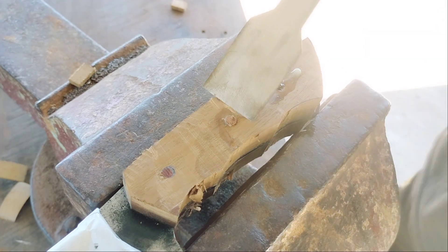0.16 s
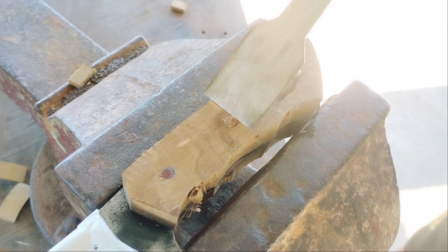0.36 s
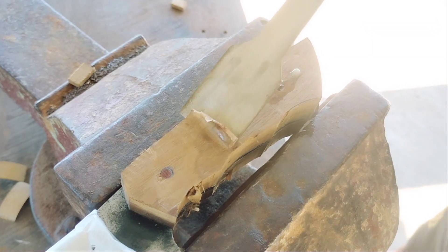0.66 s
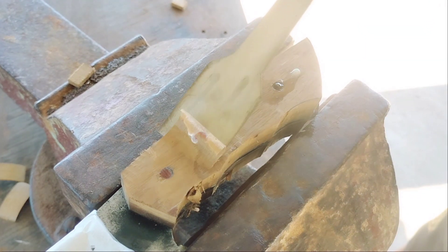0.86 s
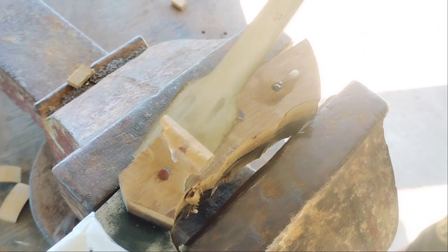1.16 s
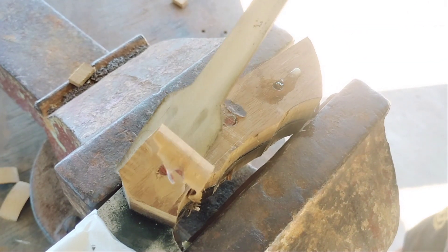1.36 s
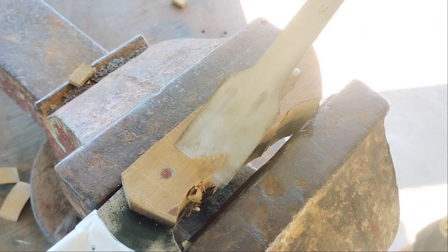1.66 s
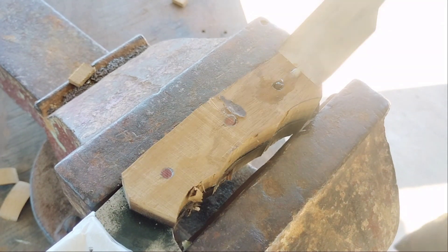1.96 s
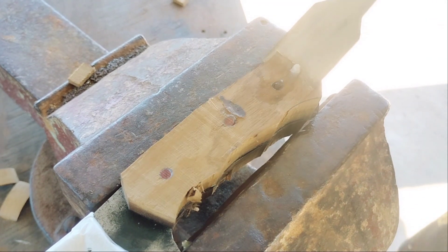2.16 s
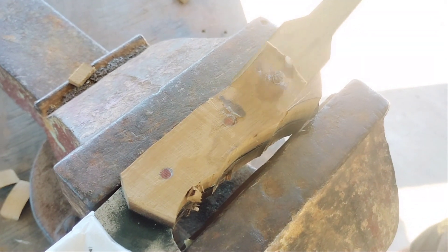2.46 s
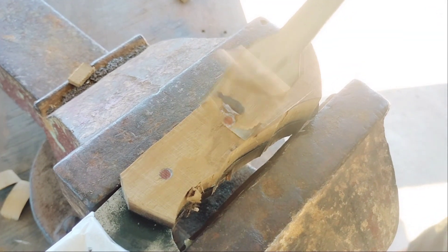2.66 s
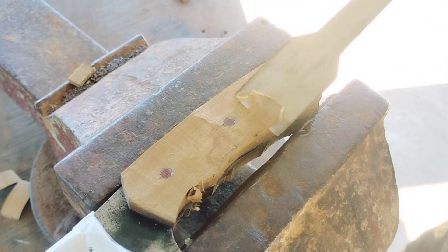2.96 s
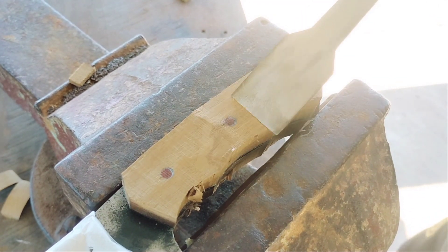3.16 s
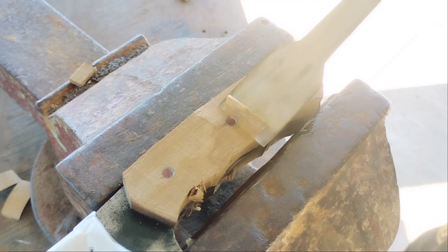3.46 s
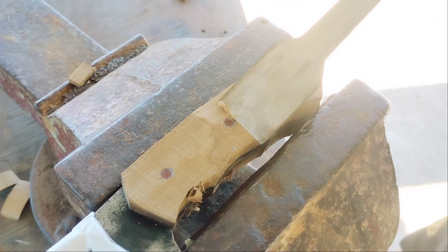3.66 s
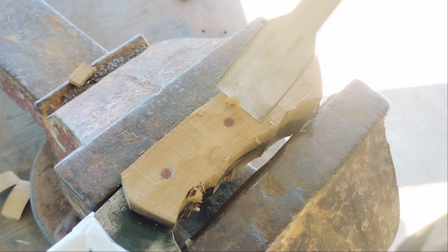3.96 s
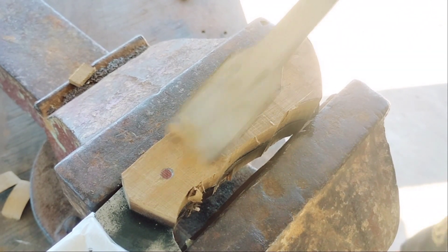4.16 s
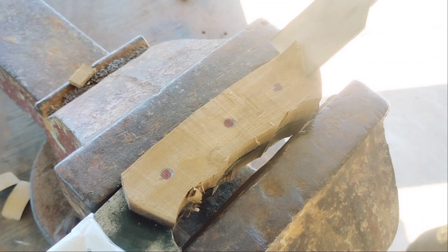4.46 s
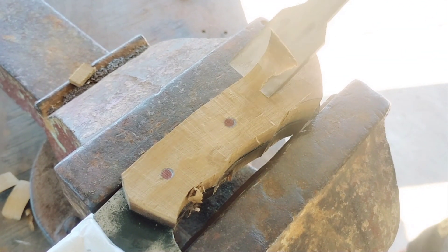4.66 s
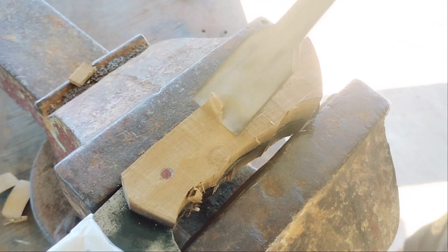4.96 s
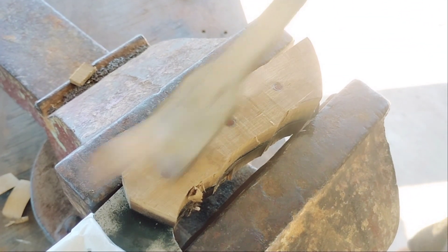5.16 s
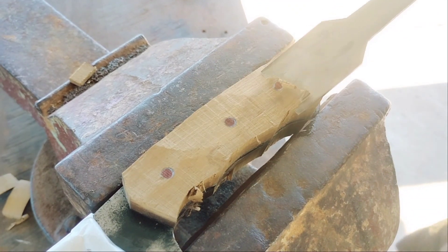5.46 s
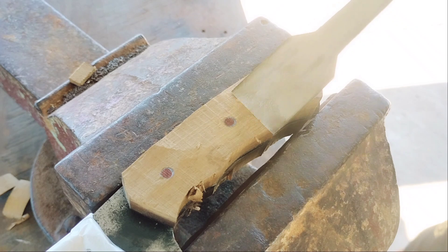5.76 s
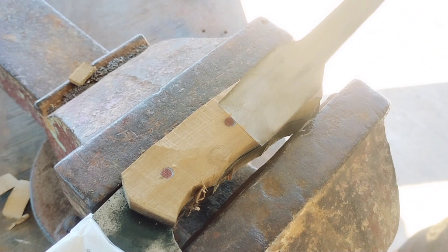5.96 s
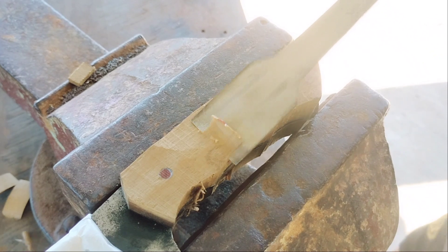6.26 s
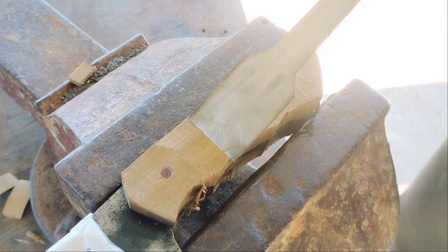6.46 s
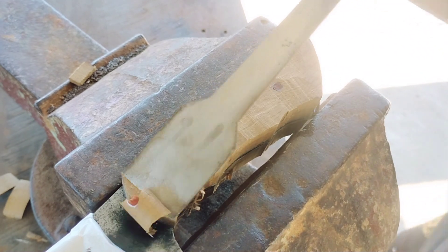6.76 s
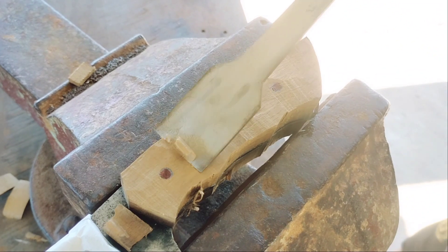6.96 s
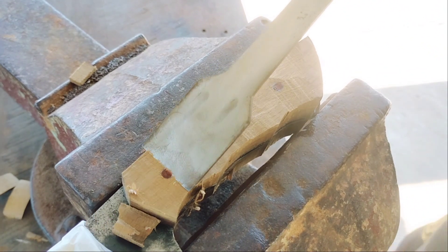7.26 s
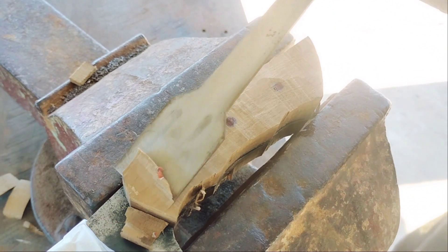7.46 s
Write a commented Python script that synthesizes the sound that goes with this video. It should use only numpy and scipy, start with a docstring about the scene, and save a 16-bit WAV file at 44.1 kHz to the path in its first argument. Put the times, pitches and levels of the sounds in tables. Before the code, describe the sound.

Wind hits the microphone at once, a cluster of low, rumbling thumps through the first 0.4 s, over a thin, far hissing rustle. A quiet, grainy scrape of steel on wood lies beneath, full of tiny fibre snaps. From about 0.4 s soft scraps of ringing appear, and near 0.6 s the first sharp knock. Strong, dry clacks follow around 1.0 to 1.4 s, bright steel with woody body, crunch and sizzle, each only milliseconds long and chopped off. A heavy gust thuds at 1.6 s. Knocks continue unevenly, several per second, with scraping rising near 2.2 s. Crisp hits stand out around 3.5, 4.5 and 5.4 s, while wind buffets densely from 4 to 5.5 s. Scraping swells again about 5.5 and 6.3 s; gusts thump near 6.1 and 6.8 s. Clipped blows persist to the end around 7.6 s.

```python
"""From the start wind buffets the microphone in thumps of filtered noise and jolts, over a far hissing rustle.
A steel blade scrapes along wood throughout: coloured noise full of tiny snaps.
From 0.4 s come soft-starting scraps of ringing, from 0.6 s also sharp blows of the chisel on its wooden handle
in a vise: decaying steel and wood partials, crunch and sizzle, each snippet cut off while it still rings."""
import sys
import numpy as np
from scipy import signal
from scipy.fft import rfft, irfft, next_fast_len
from scipy.io import wavfile
from scipy.ndimage import uniform_filter1d

SR = 44100
rng = np.random.default_rng(int(sys.argv[2]) if len(sys.argv) > 2 else 0)


def volts(x):
    """Linear amplitude factor 10**(x/20) for a level x in dB, scalar or array-like."""
    e = np.asarray(x, float) / 20
    return 10 ** e


def store_wav(level_fs):
    """Save 16-bit WAV to argv[1]."""
    pcm = np.round(np.clip(np.atleast_2d(level_fs), -1, 1) * 32767)
    wavfile.write(sys.argv[1], SR, pcm.T.astype(np.int16))


N = 335691


def rms_one(x):
    """Scale to unit power."""
    return x / np.sqrt(np.mean(x ** 2) + 1e-20)


def in_time(rows):
    """A breakpoint curve read at every sample."""
    return np.interp(np.arange(N) / SR, *np.transpose(rows))


def drift(corner_hz):
    """Random wander of rms 1: white noise through two equal one-pole low-passes."""
    r = np.exp(-2 * np.pi * corner_hz / SR)
    wander = signal.lfilter([1], [1, -2 * r, r * r], rng.standard_normal(N + SR))
    return rms_one(wander[SR:])   # the first second lets the filter settle


def band(x, low_hz, high_hz):
    """A band-pass."""
    return signal.sosfilt(signal.butter(2, [low_hz, high_hz], "band", fs=SR, output="sos"), x)


def coloured(spectrum, source):
    """A source shaped by a spectrum, rms 1."""
    hz, level_db = np.transpose(spectrum)
    size = next_fast_len(N)
    bins_hz = np.arange(size // 2 + 1) * SR / size + 1
    gain = volts(np.interp(np.log(bins_hz), np.log(hz), level_db))
    return rms_one(irfft(rfft(source, size) * gain, size)[:N])


def random_kicks(chance, spread_db):
    """Scattered clicks of either sign, each louder than 0 dB by a random amount."""
    excess_db = spread_db * np.minimum(rng.exponential(1, N), 4)
    return (rng.random(N) < chance) * rng.choice([-1, 1], N) * volts(excess_db)


# breeze between thumps: t/s, level/dB
BREEZE_CURVE = [(0.0, -23), (0.87, -37.5), (1.08, -25.5), (1.95, -36.5), (2.3, -31.5), (2.78, -40),
                (2.93, -30), (3.14, -28.5), (3.92, -31), (4.3, -24), (4.66, -29.5), (5.24, -26.5),
                (6.51, -33.5), (6.68, -34), (7.61, -33.5)]
# thumps of wind on the microphone: t/s, level/dB
THUMPS = [(0.03, -19), (0.059, -11.5), (0.093, -15.5), (0.149, -18.0), (0.169, -6.5), (0.206, -7.5),
          (0.252, -7), (0.277, -15), (0.315, -7), (0.353, -17.0), (0.374, -19.5), (0.458, -22.5),
          (0.59, -23.5), (0.771, -21.0), (0.808, -23), (0.956, -23.5), (1.044, -10.5), (1.063, -11.5),
          (1.087, -16.5), (1.122, -15.0), (1.149, -20.5), (1.163, -17.5), (1.216, -15), (1.451, -17.5),
          (1.473, -29), (1.621, -1.5), (1.648, -16.0), (1.668, -15.5), (1.701, -9.5), (1.836, -12.5),
          (1.876, -16), (1.891, -14.5), (1.952, -23), (2.259, -22), (2.39, -22), (2.682, -24.5),
          (2.913, -16.5), (2.93, -20.5), (2.959, -11.0), (2.981, -15), (3.187, -17.5), (3.215, -11.5),
          (3.352, -18.5), (3.364, -19.5), (3.403, -16.5), (3.432, -11), (3.47, -21.0), (3.49, -12),
          (3.511, -9.5), (3.544, -24), (3.875, -10.5), (4.049, -10.5), (4.079, -8.5), (4.122, -17.5),
          (4.14, -15.5), (4.166, -22.5), (4.283, -8.5), (4.328, -6), (4.355, -13), (4.376, -12.5),
          (4.407, -16.5), (4.462, -9.5), (4.496, -14.5), (4.566, -13), (4.579, -20.5), (4.793, -15.5),
          (4.815, -19.5), (4.895, -19.5), (4.965, -12.5), (5.02, -12), (5.036, -17.5), (5.07, -13),
          (5.119, -15.5), (5.157, -16.5), (5.209, -15.5), (5.304, -10), (5.326, -12.5), (5.358, -9),
          (5.413, -14), (5.46, -10.5), (5.534, -12), (5.583, -19.5), (5.654, -20), (5.743, -25.5),
          (5.765, -20), (5.832, -22.5), (5.873, -18.5), (5.907, -20.5), (6.046, -13.5), (6.098, -6.5),
          (6.122, -6.5), (6.276, -19.5), (6.374, -22.5), (6.488, -22), (6.508, -10), (6.597, -16),
          (6.648, -11), (6.7, -18.5), (6.745, -11.5), (6.779, -10.5), (6.811, -6), (6.833, -16),
          (6.852, -15.5), (6.88, -16.5), (6.892, -18), (6.928, -19), (6.97, -21), (7.231, -18),
          (7.345, -16.5), (7.386, -11), (7.486, -19.5), (7.593, -10.5)]
GUST_HOLD_S = 0.00801


def gusts():
    """Each thump leaps up, holds and sinks back into the breeze: level in dB."""
    rise_db_per_s, fall_db_per_s = 1000, 800
    t = np.arange(N) / SR
    level_db = in_time(BREEZE_CURVE) + 3.84 * drift(25)
    for s, db in THUMPS:
        near = slice(max(0, int((s - 0.1) * SR)), int((s + 0.2) * SR))
        early_s = np.maximum(s - t[near], 0)
        late_s = np.maximum(t[near] - s - GUST_HOLD_S, 0)
        own_db = db - rise_db_per_s * early_s - fall_db_per_s * late_s
        level_db[near] = np.maximum(level_db[near], own_db)
    return level_db


# wind bands: low f/Hz, high f/Hz, level/dB at a gust of -21 dB, slope/(dB per dB of gust)
BUFFET_BANDS = [(25, 40, -48.5, 1.5), (85.7, 190.6, -23, 1.2438), (133.7, 299, -25, 1.31),
                (298, 459, -37.5, 2.5), (559, 976, -44, 2), (1160, 1760, -66, 3.5)]
# how far up the thumps reach: t/s, tilt/(dB per octave)
THUMP_TILT = [(0.05, -8.5), (0.25, -0.5), (1.1, 1.5), (1.45, -10), (1.65, -0.5), (2.95, 1), (3.2, -3.5),
              (3.9, 2), (4.35, 2.5), (4.9, -3), (5.35, 1), (6.1, 1), (6.6, -2.5), (6.85, 0.5), (7.5, -5)]


def wind():
    """Lumps of turbulence, noise and jolts split in bands: stronger gusts lift the steeper bands most."""
    eddies_per_s, eddy_spread_db, eddy_share = 250.0, 4.5, 0.53   # share of power in a band's push
    core_db = 13.5   # one big eddy at the heart of each thump
    evenness, even_s = 0.63, 0.012   # chance dips and peaks of turbulence are partly evened
    tilt = in_time(THUMP_TILT)
    gust_db = gusts() + 21.0 + 1.5 * drift(30.5)
    gust_db = np.minimum(gust_db, 5.0 + 0.5 * (gust_db - 5.0))   # the strongest lumps grow more slowly
    # eddies burst on the microphone as jolts felt in every band
    jolts = random_kicks(eddies_per_s / SR, eddy_spread_db)
    cores = ((np.array(THUMPS)[:, 0] + GUST_HOLD_S / 2) * SR).astype(int)
    jolts[cores] += volts(core_db) * rng.choice([-1, 1], len(cores))
    swell_db = (gust_db + uniform_filter1d(gust_db, size=1500)) / 2   # the upper bands swell more smoothly
    base_hz = BUFFET_BANDS[1][0]
    out = np.zeros(N)
    for low_hz, high_hz, band_db, slope in BUFFET_BANDS:
        push = np.sqrt(eddy_share) * rms_one(jolts) + np.sqrt(1 - eddy_share) * rng.standard_normal(N)
        lump = rms_one(band(band(push, low_hz, high_hz), low_hz / 2, 1.75 * high_hz))
        local_power = uniform_filter1d(lump ** 2, size=int(even_s * SR))
        lump = rms_one(lump / (local_power + 0.062) ** (evenness / 2))
        tilt_db = tilt * max(0, np.log2(low_hz / base_hz))
        drive_db = swell_db if low_hz > 2 * base_hz else gust_db
        out += lump * volts(band_db + slope * drive_db + tilt_db + 1.8 * drift(48))
    return out


def tearing():
    """Rubbing noise with snaps of single fibres in it; the snaps come in clumps."""
    typical_fibres_per_s, spread_db, snap_share = 1200.0, 3, 0.46   # share of power
    rate = typical_fibres_per_s * volts(6.0 * drift(60))
    snaps = random_kicks(rate / SR, spread_db)
    return np.sqrt(snap_share) * rms_one(snaps) + np.sqrt(1 - snap_share) * rng.standard_normal(N)


# scrape loudness: t/s, level/dB
SCRAPE_CURVE = [(0.0, -48.5), (0.4, -53.5), (0.65, -43), (1.18, -45), (2.03, -51), (2.18, -33.5),
                (2.61, -45), (3.14, -51.5), (3.62, -45.5), (4.26, -47), (4.51, -42.5), (4.77, -49.5),
                (5.36, -38), (5.51, -32.5), (5.81, -45.5), (6.29, -36), (6.72, -41.5), (7.61, -46.5)]
# scrape spectrum, shape only: f/Hz, level/dB per Hz
SCRAPE_SPECTRUM = [(350, -1), (600, -1), (768, 2), (1410, -3), (2540, -8), (4800, -21), (6100, -32.5),
                   (8270, -29), (10900, -44), (16000, -47)]


def scrape():
    """The edge slides on the grain: rough noise that swells and drops rapidly and unevenly."""
    return coloured(SCRAPE_SPECTRUM, tearing()) * volts(in_time(SCRAPE_CURVE) + 3.2 * drift(28))


# far rustle spectrum, shape only: f/Hz, level/dB per Hz
RUSTLE_SPECTRUM = [(2000, -14), (3400, 0.5), (5900, -12.5), (8100, -5.5), (10900, -22.5), (16500, -12)]


def air():
    """Far rustle: coloured noise that swells with the breeze and flickers."""
    middle_db, follow_db_per_db, flicker_db = -69, 0.4, 4.5
    breeze_db = in_time(BREEZE_CURVE)
    swell_db = follow_db_per_db * (breeze_db - breeze_db.mean())
    level_db = middle_db + swell_db + flicker_db * drift(15)
    return volts(level_db) * coloured(RUSTLE_SPECTRUM, rng.standard_normal(N))


# soft starts, scraps of ringing: t/s, length/ms, level/dB
RING_SCRAPS = [(0.411, 19, -38), (0.453, 30, -34.5), (0.487, 25, -42), (0.677, 24, -37), (0.824, 15.8, -31),
               (0.929, 25, -37), (1.162, 33, -36.5), (1.199, 24, -42.5), (1.23, 26, -40.5),
               (1.319, 37, -32), (1.519, 25, -45.5), (1.5983, 27, -30.5), (1.681, 21, -30.5),
               (1.8073, 34, -31.5), (2.019, 26.4, -28.5), (2.055, 18, -39.5), (2.114, 20, -35),
               (2.214, 19, -41), (2.3623, 33, -28.5), (2.407, 22, -41), (2.461, 35, -29), (2.528, 22, -36),
               (2.6024, 25, -35.5), (2.747, 21, -47.5), (2.844, 17, -50), (2.871, 22.5, -37),
               (2.93, 25, -37), (3.0132, 31, -27), (3.389, 26, -36), (3.483, 14.5, -38.5),
               (3.561, 4.3, -39), (3.667, 14, -31.5), (3.802, 15.5, -28.5), (3.846, 28, -40),
               (3.895, 14, -37.5), (3.953, 21, -44), (3.9762, 21, -31), (4.13, 26, -24), (4.508, 15, -41),
               (4.639, 33, -36), (4.755, 37, -38), (4.895, 28, -38.5), (5.013, 27, -34.5), (5.096, 22, -36),
               (5.1252, 14.5, -27.5), (5.562, 9.5, -35), (5.805, 27, -32), (6.149, 88, -33.5),
               (6.245, 41, -33), (6.4993, 28, -38.5), (6.532, 17.5, -38), (6.985, 24, -33.5),
               (7.267, 24, -35), (7.317, 43, -38), (7.41, 20, -36.5), (7.565, 26, -36.5)]
# sharp starts, the blows: t/s, length/ms, level/dB, fall/(dB per ms), wood trim/dB,
# brightness/(dB per octave of the steel)
CHISEL_BLOWS = [(0.586, 19.5, -18.5, 0.45, 14, 3.5), (0.6625, 3, -13, 4, -6, 11.5),
                (1.0377, 12.5, -5.5, 2, -17, 4.5), (1.1367, 12, -11, 3, -23, 9),
                (1.2698, 7.4, -3, 3, 11.5, 2.5), (1.3726, 14.7, -16.5, 0.5, 12.5, 5),
                (1.414, 11.6, -10, 3.5, 13, 5.5), (1.7013, 22, -21, 0.6, 13.5, 4),
                (1.7543, 2.8, -5.5, 6, 0, 2.5), (1.8461, 22, -18.5, 1.5, 19, 2.5),
                (1.993, 13, -13, 2.5, 10, 1.5), (2.0974, 7.3, -12, 7.5, -1, 7),
                (2.1827, 17, -21, 2, 12, -0.5), (2.2573, 7.7, -19, 4, -16, 7),
                (2.4514, 3.4, -13.5, 2.5, -12, 11), (2.5537, 9.5, -18.5, 1, -20.5, 7.5),
                (2.634, 13, -19, 1, 0, 0), (2.6504, 18.3, -14, 0.9, -8, 9.5),
                (2.9011, 7.9, -20.5, 1, -17, 5), (2.9721, 12, -14, 3, -15, 5.5),
                (3.4555, 8.6, -7, 3.5, -11, 5), (3.6431, 7.4, -8, 2.6, 5, 7),
                (3.7203, 23, -20, 0.6, 14.5, -2.5), (4.085, 11, -20.5, 2, 13, 4),
                (4.4144, 9.2, -17.5, 3.5, -19, 0.5), (4.4772, 13, -8.5, 2.5, 5, 5.5),
                (4.5376, 6.7, -13.5, 2.5, 22, 7), (4.5834, 20, -20.5, 1.2, 19.5, 1),
                (4.6788, 14.7, -9.5, 1.3, 16.5, 5.5), (4.9563, 20, -17.5, 0.8, 14, -1.5),
                (5.0453, 19, -11.5, 0.8, -8, 4), (5.3148, 16, -21, 0.66, 15, -0.5),
                (5.4437, 10.7, -8.5, 1.5, -4, 6), (5.4917, 16, -23, 0.3, 6, -3),
                (5.5379, 5.9, -10, 2, -8, 4), (5.589, 12.3, -24, 0, 8, -1.5),
                (5.8301, 13.2, -13.5, 0.5, 0, 5), (6.1139, 28, -19.5, 1.5, 11.5, 0),
                (6.2016, 11, -10, 3, 4, 0.5), (6.2984, 5.4, -21.5, 3.5, -15, 6),
                (6.3407, 22, -19.5, 0.37, 17.5, 0.5), (6.5696, 8.9, -19.5, 0.5, 5, 3.5),
                (6.6218, 20.6, -18, 0.5, 6.5, -3.5), (6.71, 20.5, -16.5, 0.8, -10, 4.5),
                (6.7636, 19, -12, 1.4, 12.5, -2.5), (6.9252, 20, -18.5, 0.56, 7, -1),
                (7.0248, 5.4, -11.5, 2, -20, 8), (7.0668, 18.7, -22.5, 0.45, 2, 1),
                (7.156, 7, -17.5, 5.5, -2, 2.5), (7.297, 12.4, -10, 1.35, 9, 3),
                (7.3608, 11.5, -10.5, 2, 10, 1.5), (7.4407, 18.4, -15.5, 1, 13.5, -2)]


def snippets():
    """Rows of t/s, rise/ms, length/ms, level/dB, fall/(dB per ms), wood trim/dB, brightness."""
    rows = []
    for s, length_ms, db in RING_SCRAPS:
        rows.append((s, 0.38 * length_ms, length_ms, db, 0.72, 13, 0))
    for s, length_ms, db, *rest in CHISEL_BLOWS:
        rise_ms = 0.8 - 0.015 * db   # weaker blows start a little slower
        rows.append((s, rise_ms, length_ms, db, *rest))
    return rows


PIVOT_HZ = 3200   # the ring tilts about this pitch, the crunch brightens above it


def ringing(modes, t, phase_s, draws, tilt_db):
    """Decaying partials with new strengths and pitches each time; wider modes die sooner."""
    hz, width, level_db = np.transpose(modes)[:, :, None]
    chance_db = 4.5 * draws[:len(modes), None]
    strength = volts(level_db + chance_db + tilt_db * np.log2(hz / PIVOT_HZ))
    pitch = hz * (1 + 0.016 * draws[-len(modes):, None])   # the blade sits at a new spot each time
    decay = np.exp(-0.25 * (width - width.min()) * t)   # on top of the snippet's own fall
    partials = strength * np.sin(2 * np.pi * pitch * (t + phase_s)) * decay
    return partials.sum(axis=0) / np.sqrt(np.sum(strength ** 2) / 2)


# low ring of handle and vise: f/Hz, width/Hz, level/dB before tilt
WOOD_MODES = [(826, 150, 0.5), (1305, 180, 6), (1534, 61, -0.5)]
# high ring of the chisel: f/Hz, width/Hz, level/dB before tilt
STEEL_MODES = [(2370, 54, 1.5), (2653, 48, -1.5), (2896, 40, -4.5), (3667, 94, 0), (4173, 97, -11.5),
               (5170, 660, -3.5)]
# crunch of fibres under the edge, shape only: f/Hz, level/dB per Hz
CRUNCH_SPECTRUM = [(290, -13), (500, -7), (1420, -1.5), (2130, -11), (3700, -7.5), (5240, -17),
                   (6230, -28.5), (8210, -20.5), (16000, -54.5)]


def blows():
    """Snippets of ring, crunch and sizzle: rise, steady fall, abrupt cut; hard starts crack."""
    out = np.zeros(N + SR)
    crunch = coloured(CRUNCH_SPECTRUM, tearing())
    crunch_top = signal.sosfilt(signal.butter(1, PIVOT_HZ, "high", fs=SR, output="sos"), crunch)
    waver = volts(5.0 * drift(150))   # contact with the wood shakes the ring
    wood_waver = waver[::-1]
    sizzle = rms_one(band(rng.standard_normal(N), 5800, 21700))
    for s, rise_ms, length_ms, level_db, fall_db, wood_db, bright_db in snippets():
        draws = rng.standard_normal(40)
        first = round(s * SR)
        t = np.arange(round(length_ms * SR / 1000)) / SR
        here, ms = slice(first, first + len(t)), 1000 * t
        hard = np.exp(-rise_ms / 2.7)   # near 1 for a sharp start, near 0 for a soft one
        soft = 1 - hard
        rise_db = -(9.2 + 41.0 * hard) * (1 - ms / rise_ms)
        shape_db = np.where(ms < rise_ms, rise_db, -fall_db * (ms - rise_ms))
        gate = np.clip((length_ms - ms) / 0.95, 0, 1)   # shuts within the last 0.95 ms
        phase_s = 0.016 * soft   # soft starts enter the waves at a later phase

        steel = volts(-7.5) * ringing(STEEL_MODES, t, phase_s, draws[:20], bright_db) * waver[here]
        wood = volts(wood_db - 15.5) * ringing(WOOD_MODES, t, phase_s, draws[20:], tilt_db=2)
        wood = wood * volts(0.27 * fall_db * ms) * wood_waver[here]   # wood falls more slowly
        bite = crunch[here] + (volts(bright_db) - 1) * crunch_top[here]
        bite = volts(1.56 * soft) * bite / np.std(crunch[here])
        crack_db = 12.7 * hard * np.exp(-np.maximum(ms - rise_ms, 0) / 0.5)
        fizz = volts(-28.5 + 1.3 * bright_db + crack_db) * sizzle[here]
        out[here] += volts(level_db + shape_db) * gate * (steel + wood + bite + fizz)
    return out[:N]


def scene():
    """All sources meet at one microphone."""
    return (wind() + scrape() + air() + blows())[None]


def band_limit(x):
    """A steep low-pass at the top of the band."""
    return signal.sosfilt(signal.butter(12, 16950, fs=SR, output="sos"), x)


def record(dry):
    """Peaks are rounded softly and the top is cut steeply."""
    ceiling, cutoff_hz = 0.95, 16900
    rounded = ceiling * np.tanh(dry / ceiling)
    low_pass = signal.cheby2(10, 60, cutoff_hz, fs=SR, output="sos")
    mix = signal.sosfilt(low_pass, rounded)
    return band_limit(mix)


dry = scene()
out = record(dry)
store_wav(out)
```